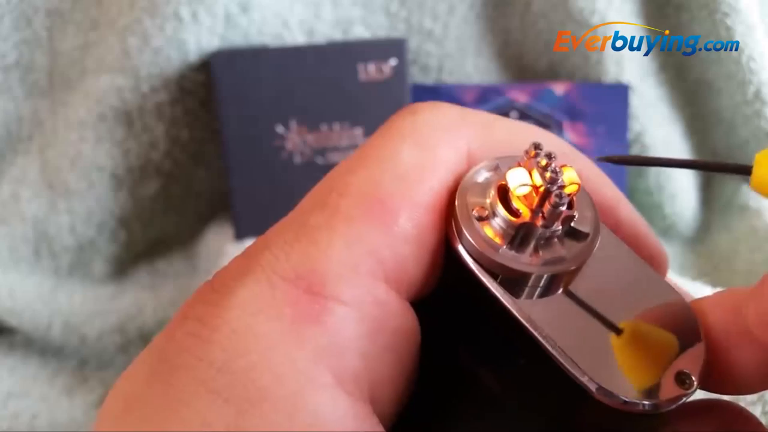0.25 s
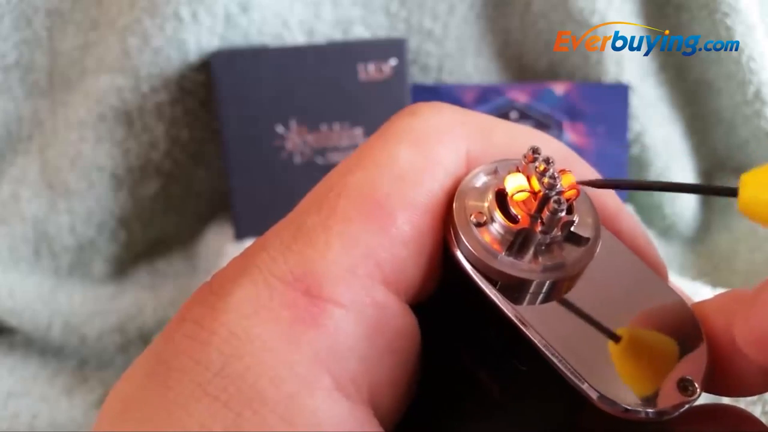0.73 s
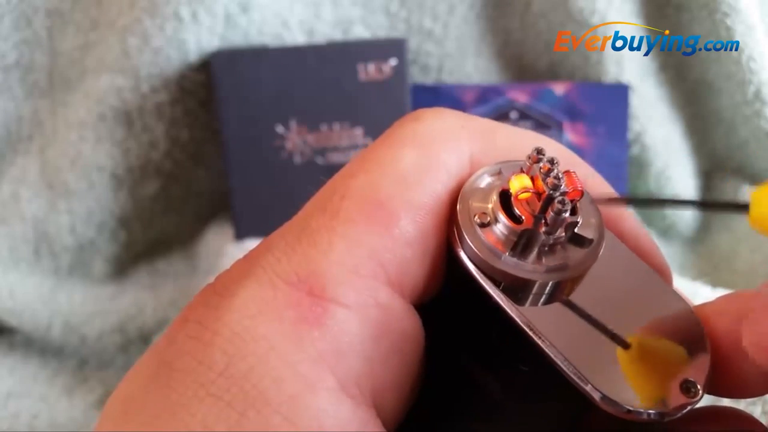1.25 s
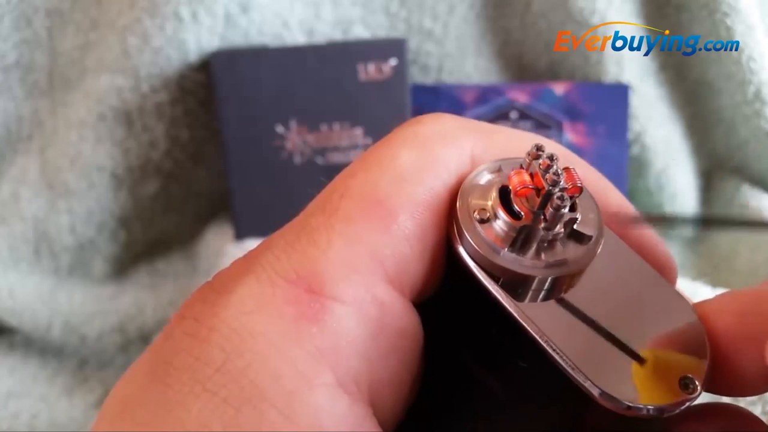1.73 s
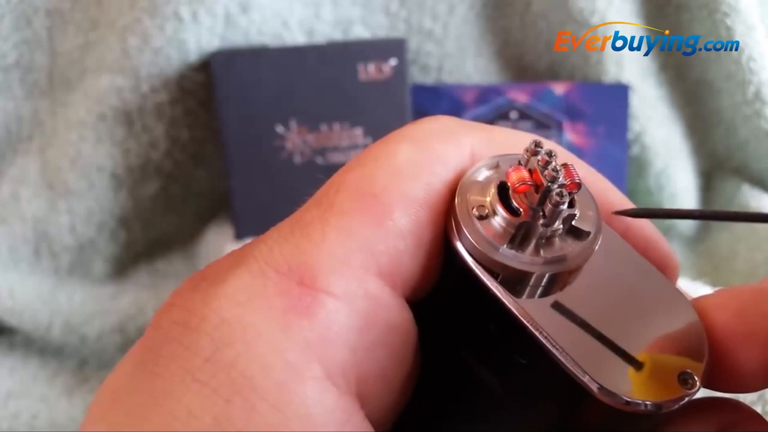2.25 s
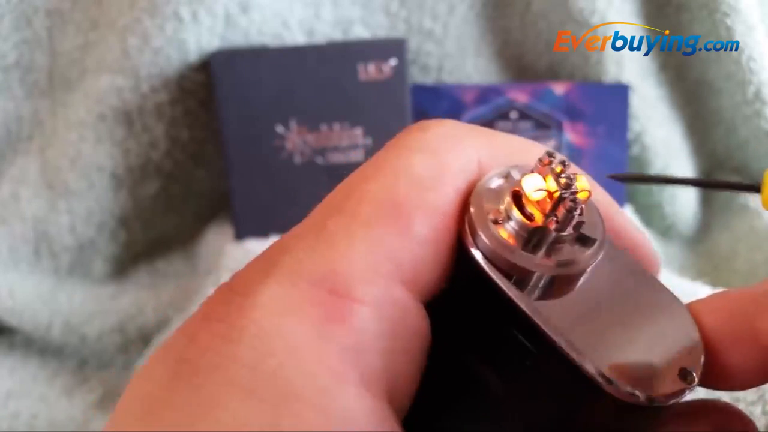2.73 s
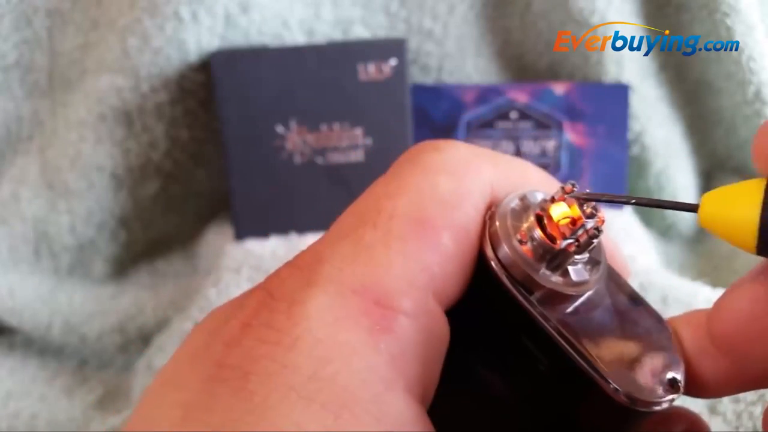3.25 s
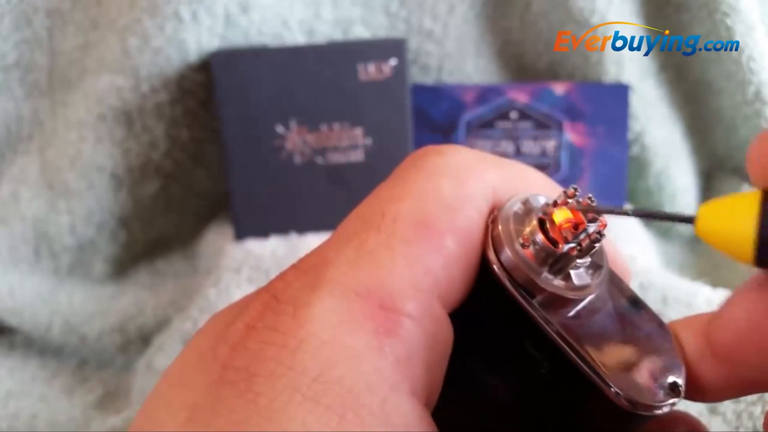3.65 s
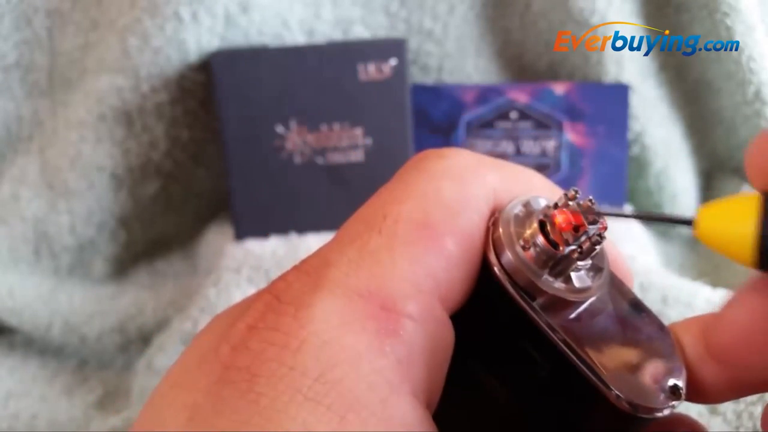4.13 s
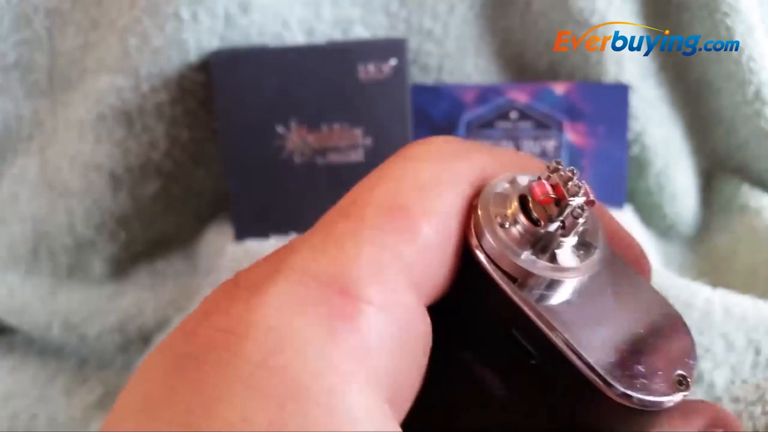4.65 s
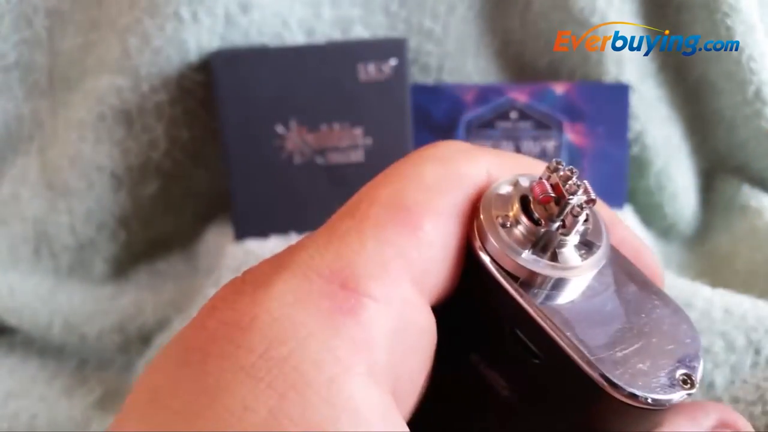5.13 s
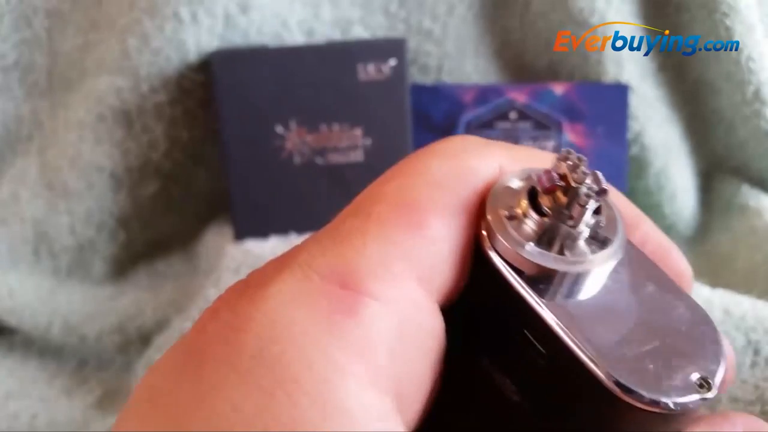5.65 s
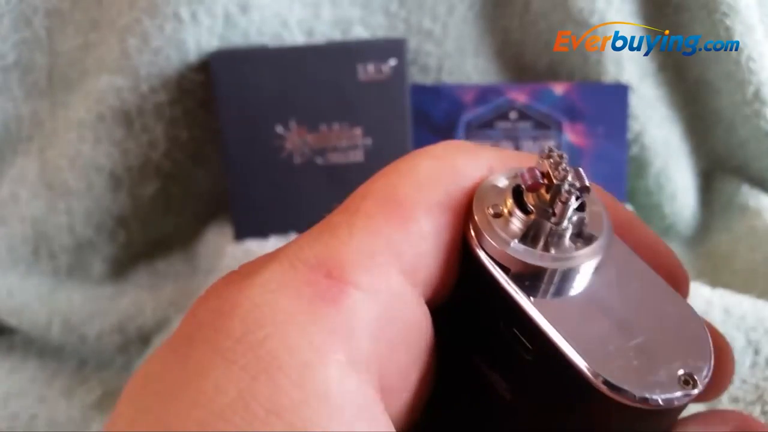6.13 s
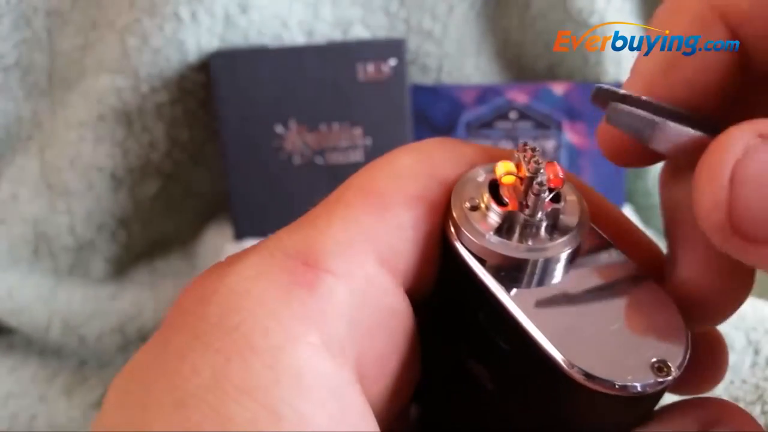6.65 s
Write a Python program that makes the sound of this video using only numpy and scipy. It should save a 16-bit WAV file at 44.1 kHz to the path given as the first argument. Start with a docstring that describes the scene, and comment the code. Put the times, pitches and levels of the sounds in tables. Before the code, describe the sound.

In a small quiet room with a steady low fan hum, a fine screwdriver rakes tiny wire coils, five short ridged scratches, a pause, then five more, with thin high squeals near the end. The hand then shifts its grip: the metal case clicks, rustles and takes two hard knocks, leaving small metallic rattles. Close stereo microphone, the case leaning left.

```python
"""Screwdriver on vape coils

A small screwdriver rakes the wire coils of a hand-held vape mod, in two runs of five strokes: each slip
is a burst of shaped noise that rings a post and a wire. Thin gliding sines squeal, the last after the tenth.
Then the grip shifts: the case rubs as grainy noise, clicks, and is knocked as a set of decaying modes, hard
enough to pull the recorder's gain down. A fan's air noise and low steady hum lie under it in a small, quiet room."""
import sys
import numpy as np
from scipy import signal
from scipy.fft import rfft, irfft, next_fast_len
from scipy.io import wavfile
from scipy.ndimage import uniform_filter1d, minimum_filter1d, map_coordinates

SR = 44100
rng = np.random.default_rng(int(sys.argv[2]) if len(sys.argv) > 2 else 0)


def generate_wav(signal):
    """Clip the signal to [-1, 1] and save it as 16-bit WAV at the path in sys.argv[1]."""
    frames = np.transpose(np.atleast_2d(signal))
    scaled = np.clip(frames, -1, 1) * 32767
    pcm = np.round(scaled).astype(np.int16)
    wavfile.write(sys.argv[1], SR, pcm)


N = 303981

# All table levels are relative dB: later gains add to them.
# Blade strokes over the coil. Each row: first slip in seconds, length in seconds, pace (1 even, less =
# speeding up), middle slip in dB, last slip over first in dB, outer slips under the middle in dB, drag in dB,
# pressure (weight of the lower spectrum) in dB, post ring in Hz, its gain in dB, wire ring in Hz, its gain in dB.
STROKES = [(1.255, 0.1, 1.2, -61.5, 1, -1, -62, 2, 2200, 12, 9500, 11),
           (1.541, 0.039, 0.82, -36.5, -4.5, -0.5, -49, -0.5, 3350, -1, 5300, 1),
           (1.801, 0.032, 0.88, -32.5, -9, 1.5, -47, -0.5, 3380, 4, 5500, 2),
           (2.0321, 0.04, 0.83, -34.5, -5.5, 0, -47, -1.5, 2200, -4, 5340, 4.2),
           (2.267, 0.028, 0.6, -32, 0, 0, -51.5, 3.5, 2400, -5.5, 6700, 3.7),
           (4.040, 0.048, 0.81, -43, -11, 0, -52.5, -3, 2150, 11, 8100, 4.3),
           (4.2864, .0305, .78, -36.5, -4, -1, -54.5, -6, 2190, 14, 7700, 3),
           (4.524, 0.026, 0.83, -34, -7, 2, -46.5, -6, 2320, 12.5, 7200, 6.6),
           (4.7481, 0.037, 0.96, -36, -12, 0.5, -51.5, -5, 2300, 9, 6160, 7),
           (4.9319, 0.025, 1.17, -29.5, 4, 3.5, -41.5, -7, 2010, 8.5, 6560, 7)]
# Single touches of the blade on the wire. Each row: start in seconds, level in dB.
TICKS = [(1.24, -57.5), (1.257, -49), (1.273, -41), (1.2925, -39), (1.3245, -33.5), (1.342, -47),
         (1.353, -49), (1.511, -55), (2.023, -52.5), (4.031, -47), (4.035, -51.5), (4.515, -48.5),
         (4.921, -47), (4.924, -37.5)]
# Spectrum of a scratch on the wire. Each row: frequency in Hz, level in dB.
WIRE_SPECTRUM = [(500, -20), (900, 4.5), (1200, 3.5), (1500, -9.5), (2150, 3), (3000, -1), (4500, -5),
                 (6000, -4), (7500, -0.5), (9500, -3), (12500, 1.5), (15500, -0.5)]
# Ringing posts of the coil deck. Each row: centre in Hz, width in Hz, level in dB.
DECK_MODES = [(1980, 150, -0.5), (2220, 57, -2.5), (2574, 39, 1.5), (3650, 40, 9.5), (5060, 89, -4)]
# Thin squeals, one curve each. Each row of a curve: time in seconds, pitch in Hz, level in dB.
WHISTLES = [
    [(1.85, 5420, -100), (1.9, 5400, -82), (2.0, 5360, -87), (2.04, 5350, -102)],
    [(4.8, 5730, -88), (4.834, 5897, -69), (4.87, 6050, -74), (4.91, 6140, -78), (4.98, 6300, -90)],
    [(5.0, 5320, -82), (5.034, 5483, -76), (5.066, 6100, -67), (5.12, 6348, -71), (5.18, 6800, -75),
     (5.228, 7000, -71), (5.27, 6750, -75), (5.322, 6304, -77), (5.392, 6160, -66.5), (5.44, 5700, -75),
     (5.47, 5550, -95)],
    [(5.48, 6200, -78), (5.495, 5950, -78), (5.515, 5700, -97)],
]
# Upper modes of the squeals. Each row: ratio to the pitch, level in dB.
WHISTLE_MODES = [(1.29, -9.5), (1.64, -4), (1.79, -5.5)]
# Treble hiss over time. Each row: time in seconds, level in dB.
HISS_LEVEL = [(0, -100), (1.2, -98), (1.4, -74.5), (2.249, -76), (2.6, -82), (3.2, -112), (3.9, -85),
              (4.17, -76.5), (5.06, -71.5), (5.3, -70), (5.62, -80), (6.05, -64), (6.3, -105)]
# Treble hiss spectrum. Each row: frequency in Hz, density in dB per Hz.
HISS_SPECTRUM = [(2000, -28), (4300, 3.5), (6500, 1), (8500, -8.5), (11000, -4), (14000, 4.5),
                 (15600, -1.5)]
# Knocks on the case. Each row: start in seconds, ring in dB, contact softness corner in Hz, place (0 middle,
# 1 edge), pitch ratio, left minus right in dB, thud in dB, thud pitch in Hz.
KNOCKS = [(5.6457, -19.5, 1900, 0.17, 1.06, -5, -18, 590),
          (5.665, -17.5, 130, 0.081, 1.03, -4.5, -22.5, 233), (5.7579, -32, 386, .12, 1.04, -6, -28, 230),
          (5.8989, -7, 3510, 0.25, 1.0, 0.5, -20.5, 760), (5.9365, -11, 2840, 0.97, 1.01, 0, -20.5, 760)]
# Modes of the case. Each row: frequency in Hz, level in dB, t60 in seconds, extra at the edge in dB.
CASE_MODES = [(52.2, -37.5, 0.97, -5), (142.2, -11, 0.3, -14), (355.7, -4, 0.053, -12.5),
              (429, -10.5, 0.038, -6.5), (680, -4.5, 0.014, -0.5), (886, -16.5, 0.045, 12.5),
              (1030, -5, .032, -4), (1594, -12, .016, -3), (1890, -13.5, 0.018, 6),
              (2090, -14.5, 0.021, 5.5), (2440, -13, 0.021, -8.5), (2580, -31.5, 0.16, -16),
              (3250, -30, 0.17, -26), (3270, -4, 0.015, -21.5), (3850, -18, 0.015, -7)]
# Finger bumps too dull to ring the case. Each row: start in seconds, level in dB, pitch in Hz.
BUMPS = [(0.680, -44.5, 594), (2.509, -45.5, 620), (3.308, -50, 200), (3.3115, -41.5, 560),
         (3.317, -55, 620), (5.688, -33.5, 620), (5.7657, -33, 480), (5.7712, -27, 332), (5.781, -34, 435),
         (5.7867, -35, 768), (5.798, -35, 540), (5.811, -36.5, 280), (5.818, -39, 201), (5.839, -38, 290),
         (5.870, -39, 400), (5.876, -37, 330)]
# Clicks of the button and loose fittings. Each row: start in seconds, level in dB, treble sizzle in dB.
CLICKS = [(5.6425, -37.5, 9.5), (5.647, -34, 7), (5.6662, -37.5, 10.5), (5.69, -32, 0.5),
          (5.759, -41.5, -18), (5.7655, -52, -23.5), (5.785, -40, -12), (5.849, -42.5, -17.5),
          (5.9386, -29.5, -4.5), (5.9535, -39, 4), (5.961, -42.5, -0.5), (5.997, -53, 9), (6.032, -48.5, 7),
          (6.047, -53, 5), (6.094, -53, 5), (6.175, -60.5, 13.5), (6.262, -48, 9), (6.269, -42.5, 7.5),
          (6.757, -58, 2), (6.814, -46, -13), (6.825, -50, 2), (6.834, -35, 6)]
# Resonances of the fittings. Each row: centre in Hz, width in Hz, level in dB.
FITTINGS = [(3950, 1000, -2), (6140, 900, -11), (7260, 500, 3), (7930, 490, 2)]
# Lasting ring of the fittings. Each row: frequency in Hz, level in dB, t60 in seconds.
TINKLE = [(5900, -12, 0.059), (6640, -11, 0.064), (7060, -4, 0.083), (7380, -4.5, 0.12), (7880, 3, 0.032),
          (10430, -11, .08), (12230, -21, .09)]
# Thin steel parts ringing on. Each row: start in seconds, level in dB, pitch in Hz, t60 in seconds.
PINGS = [(5.851, -47.5, 7950, .06), (5.939, -32, 7800, 0.033), (6.273, -57, 7200, 0.1),
         (6.432, -59, 7100, 0.33), (6.815, -54, 7700, .06), (6.834, -45, 7670, 0.12),
         (6.835, -54, 4920, 0.082)]
# Skin sliding on the case. Each row: start in seconds, length in seconds, level in dB, brightness corner in Hz.
RUBS = [(5.649, 0.056, -42, 1000), (5.765, 0.042, -44.5, 650), (5.809, 0.076, -47.5, 379),
        (5.945, 0.022, -38, 604), (6.77, 0.097, -46, 400)]
# Spectrum of sliding skin. Each row: frequency in Hz, level in dB.
SKIN_SPECTRUM = [(60, -10.5), (145, 4.5), (200, -1), (300, 1.5), (420, 0.5), (650, -6.5), (1100, -10),
                 (1600, -13), (4000, -10), (7500, -19.5), (15000, -24)]
# Scuffs with one resonance. Each row: start in seconds, length in seconds, level in dB, centre in Hz, width in Hz.
SCUFFS = [(6.217, 0.027, -61, 2940, 497), (6.252, 0.028, -52, 3030, 900), (6.767, 0.066, -46.5, 505, 312),
          (6.769, .05, -49, 1000, 604), (6.824, 0.04, -62, 4800, 300), (6.831, 0.01, -45, 1000, 910)]
# Fan air spectra: low, middle, high. Each row: frequency in Hz, density in dB per Hz.
FAN_LOW = [(15, -7.5), (30, -22), (48, -1.5), (75, -3.5), (110, -12.5), (170, -2.5), (240, -5.5),
           (330, -6.5), (400, -14), (520, -14), (700, -17), (1000, -21), (2000, -61)]
FAN_MID = [(410, -38), (700, -23.5), (846, -14), (951, -25), (1030, -6.5), (1120, -11.5), (1430, -11.5),
           (2000, -8.5), (2250, -4.5), (2380, -2), (2720, -12), (3240, -10), (4000, -23), (5200, -45.5),
           (8800, -120)]
FAN_HIGH = [(2500, -26), (4000, 1.5), (5000, 1), (7200, 2.5), (8300, -17.5), (10500, -10), (12500, 0.5),
            (14200, 8), (16000, -22.5)]
# Hum lines of the fan. Each row: frequency in Hz, level in dB rms.
HUM = [(58.5, -54), (117, -64), (167, -65.5), (233, -61), (303, -61), (485, -74), (1001, -78.5),
       (2328, -70)]
# Left-right likeness of air noise. Each row: frequency in Hz, correlation.
ALIKE = [(60, 0.8), (150, 0.94), (380, 0.46), (950, 0.009), (2380, 0.11), (5980, 0.03), (15000, 0.09)]
# Room decay. Each row: frequency in Hz, t60 in seconds.
ROOM_T60 = [(100, 0.54), (500, 0.38), (3000, 0.37), (8000, 0.5), (15000, 0.22)]
# Colour difference of the two microphone ports. Each row: frequency in Hz, left minus right in dB.
PORTS = [(2000, 1.5), (3000, 5), (4300, 3), (5800, 9.5), (7200, 5), (8300, -11.5), (10500, -16),
         (14000, -6)]
# Lean of the case, which lies to the left. Each row: frequency in Hz, left minus right in dB.
CASE_LEAN = [(60, 12), (150, 7.5), (400, 11.5), (850, 9.5), (1100, 4.5), (1400, 5), (2100, 4.5),
             (3000, 9.5), (8000, 8), (14000, 2)]

TOP_HZ = 15800  # band limit
WINDINGS = 7
OVERHANG_S = 0.0033  # blade contact before the first slip and after the last
SLIP_SCATTER_DB = -0.5  # random spread of the slips
PRESS_GROWS_DB = 17  # pressure on the last winding over the first
RIPPLE_HZ = 455  # spacing of the random peaks and dips in a scratch
THUD_CYCLES = 0.64  # half-width of a contact's push
# fittings shaken by a knock: level at a 0 dB middle blow, dB per dB of blow, extra at the edge, sizzle
SHAKE_DB, SHAKE_GROWS, SHAKE_EDGE_DB, SHAKE_SIZZLE_DB = -27, 0.99, 6.5, -4


def amp(db):
    """Decibels to gain."""
    return 10 ** (np.asarray(db) / 20)


def unit(x):
    """Scale to rms 1."""
    return x / np.sqrt(np.mean(x ** 2) + 1e-20)


def along(points, hz):
    """Interpolate (Hz, value) points on a log frequency axis."""
    f, v = np.transpose(points)
    return np.interp(np.log(hz + 1), np.log(f + 1), v)


def wobble(rate):
    """Smooth random curve with rate knots a second."""
    knots = rng.standard_normal(int(N * rate / SR) + 4)
    return map_coordinates(knots, [np.arange(N) * rate / SR])


def filtered(x, response, size=8192):
    """Multiply the spectrum of x by a complex response of frequency."""
    n = x.shape[-1]
    m = next_fast_len(n + size, real=True)
    return irfft(rfft(x, m) * response(np.fft.rfftfreq(m, 1 / SR)), m)[..., :n]


def noise(size, alike):
    """Stereo white noise whose sides share the power fraction alike."""
    share = np.clip(alike, 0, 1)
    common = np.sqrt(share) * rng.standard_normal(size)
    return common + np.sqrt(1 - share) * rng.standard_normal((2, size))


def pan(db):
    """Channel gains for a left-minus-right level."""
    return amp([[db / 2], [-db / 2]])


def add(track, s, sound):
    """Mix a sound in from time s."""
    part = track[..., round(s * SR):][..., :sound.shape[-1]]
    part += sound[..., :part.shape[-1]]


def bell(hz, centre, width):
    """Zero-phase resonance peak of height 1."""
    return 1 / (1 + (2 * (hz - centre) / width) ** 2)


def resonance(hz, centre, width):
    """Causal response of one mode."""
    return 1j * hz * width / (centre ** 2 - hz ** 2 + 1j * hz * width)


def ripple(hz, depth_db):
    """Fresh set of random peaks and dips in the spectrum."""
    knots = rng.standard_normal(128)
    return amp(depth_db * map_coordinates(knots, [hz / RIPPLE_HZ], mode="nearest"))


def coil(slip_t60_s=0.0059, rise_s=0.00094, slip_db=5, after_db=-27, after_t60_s=0.073, grit_db=4.5,
         ripple_db=4.0, press_hz=4000, tick_press_db=-9, post_width_hz=260, wire_width_hz=380):
    """The blade drops from winding to winding; each slip is a short scratch ringing post and wire."""
    out, t = np.zeros((2, N)), np.arange(SR // 6) / SR

    def scratch(press_db):
        def colour(hz):
            pressed_db = press_db / (1 + (hz / press_hz) ** 2)
            return ripple(hz, ripple_db) * amp(along(WIRE_SPECTRUM, hz) + pressed_db)
        return unit(filtered(noise(len(t), alike=0.22), colour, size=512))

    decay = amp(-60 * t / slip_t60_s) + amp(after_db - 60 * t / after_t60_s)
    slip = (1 - np.exp(-t / rise_s)) * decay
    grit = amp(grit_db * wobble(700))
    for (s, length_s, pace, db, swell_db, arch_db, drag_db, press_db,
         post_hz, post_db, wire_hz, wire_db) in STROKES:
        # bear down, drag, lift away
        bearing = np.sin(np.pi * np.minimum(t / (length_s + 2 * OVERHANG_S), 1))
        stroke = amp(drag_db) * bearing * scratch(press_db) * grit[round(s * SR):][:len(t)]
        for across in np.linspace(0, 1, WINDINGS):
            level_db = db + swell_db * (across - 0.5) - arch_db * (2 * across - 1) ** 2
            level_db += SLIP_SCATTER_DB * rng.standard_normal()
            touch = scratch(press_db + PRESS_GROWS_DB * (across - 0.5))
            add(stroke, OVERHANG_S + length_s * across ** pace, amp(level_db + slip_db) * slip * touch)

        def ring(hz):
            post = (amp(post_db) - 1) * resonance(hz, post_hz, post_width_hz)
            wire = (amp(wire_db) - 1) * resonance(hz, wire_hz, wire_width_hz)
            return 1 + post + wire

        add(out, s - OVERHANG_S, filtered(stroke, ring))
    for s, db in TICKS:
        add(out, s, amp(db + slip_db) * slip * scratch(tick_press_db))
    return out


def deck(x, ring_db=-2):
    """The scratches excite a few short resonances of the metal deck."""
    def modes(hz):
        return sum(amp(db) * resonance(hz, centre, width) for centre, width, db in DECK_MODES)
    return x + amp(ring_db) * filtered(x, modes)


def whistles(side_db=13, upper_side_db=-3, level_db=-5, flutter_db=3, waver=0.011,
             upper_hz=6300, upper_width_hz=250):
    """Thin gliding squeals; their upper modes join in as the pitch climbs."""
    out = np.zeros((2, N))
    flutter = amp(flutter_db * wobble(60))
    drift = 1 + waver * wobble(500)
    for rows in WHISTLES:
        s, hz, db = np.transpose(rows)
        i = np.arange(round(s[0] * SR), round(s[-1] * SR))
        pitch_hz = np.interp(i / SR, s, hz) * drift[i]
        phase = 2 * np.pi * np.cumsum(pitch_hz) / SR
        opening = (1 + np.tanh((pitch_hz - upper_hz) / upper_width_hz)) / 2
        upper = opening * sum(amp(mode_db) * np.sin(ratio * phase) for ratio, mode_db in WHISTLE_MODES)
        level = amp(level_db + np.interp(i / SR, s, db)) * flutter[i] * np.sqrt(2)
        out[:, i] += level * (pan(side_db) * np.sin(phase) + pan(upper_side_db) * upper)
    return out


def thud(t, hz):
    """Push of a contact: about one cycle, with no ring."""
    cycles = t * hz
    return np.sin(2 * np.pi * cycles) * np.exp(-((cycles - 1) / THUD_CYCLES) ** 2)


def knocks(choke_hz=2200, choke_t60_s=0.014, buzz_db=1.5, crack_db=-23, crack_t60_s=0.013,
           rise_s=0.00037, bump_side_db=-4):
    """Blows ring the case: soft ones its low modes; grip shifts pitch, the next contact chokes high modes."""
    out, t = np.zeros((2, N)), np.arange(SR // 3) / SR
    for k, (s, db, soft_hz, edge, tuning, side_db, thud_db, thud_hz) in enumerate(KNOCKS):
        free_s = KNOCKS[k + 1][0] - s if k + 1 < len(KNOCKS) else 1
        choke = amp(-60 * np.maximum(t - free_s, 0) / choke_t60_s)
        ring = np.zeros(len(t))
        for m, (hz, mode_db, t60_s, edge_db) in enumerate(CASE_MODES):
            decay = amp(mode_db + edge * edge_db - 60 * t / t60_s) / np.hypot(1, hz / soft_hz)
            if hz > choke_hz:
                decay = decay * choke
            ring += (-1) ** m * decay * np.sin(2 * np.pi * tuning * hz * t)
        ring = ring * amp(buzz_db * wobble(370)[:len(t)])  # loose parts roughen the ring
        crack = unit(filtered(noise(len(t), alike=0.6), lambda hz: 1 / (1 + 1j * hz / soft_hz) ** 2))
        crack = amp(crack_db - 60 * t / crack_t60_s) * crack
        blow = amp(db) * (1 - np.exp(-t / rise_s)) * (ring + crack)
        add(out, s, pan(side_db) * (blow + amp(thud_db) * thud(t, thud_hz)))
    for s, db, hz in BUMPS:
        add(out, s, pan(bump_side_db) * amp(db) * thud(t, hz))
    return out


def clicks(snap_t60_s=0.0096, rattle_db=-20, rattle_t60_s=0.17, sizzle_db=-6, rise_s=0.0011,
           tinkle_db=-14, scatter_db=2.5, body_hz=8600, chatter_db=2.5, chatter_rate=220):
    """Small metal parts snap, rattle briefly in their resonances and ring on; every knock shakes them."""
    out, t = np.zeros((2, N)), np.arange(SR // 3) / SR

    def metal(hz):
        peaks = sum(amp(db) * bell(hz, centre, width) for centre, width, db in FITTINGS)
        return peaks / np.hypot(1, (hz / body_hz) ** 10)

    def treble(hz):
        return hz / (hz + 3000) * (hz < TOP_HZ)

    attack = 1 - np.exp(-t / rise_s)
    snap = attack * amp(-60 * t / snap_t60_s)
    rattle = attack * amp(rattle_db - 60 * t / rattle_t60_s)
    shaken = [(s, SHAKE_DB + SHAKE_GROWS * db + SHAKE_EDGE_DB * edge, SHAKE_SIZZLE_DB)
              for s, db, _, edge, *_ in KNOCKS]
    for s, db, top_db in CLICKS + shaken:
        body = unit(filtered(noise(len(t), alike=0.22), metal))
        sizzle = unit(filtered(noise(len(t), alike=0.17), treble))
        tinkle = np.zeros((2, len(t)))
        for hz, mode_db, t60_s in TINKLE:
            level_db = mode_db + scatter_db * rng.standard_normal((2, 1))
            tinkle += amp(level_db - 60 * t / t60_s) * np.sin(2 * np.pi * (hz * t + rng.random((2, 1))))
        chatter = unit(amp(chatter_db * wobble(chatter_rate)[:len(t)]))  # uneven bursts
        struck = (snap + rattle * chatter) * (body + amp(sizzle_db + top_db) * sizzle)
        add(out, s, amp(db) * (struck + amp(tinkle_db) * attack * tinkle))
    for s, db, ping_hz, ping_t60_s in PINGS:
        add(out, s, amp(db - 60 * t / ping_t60_s) * attack * np.sin(2 * np.pi * ping_hz * t))
    return out


def rubs(grip_db=2.5, catch_rate=300, side_db=-5):
    """Skin catches and slides on the case: dull grainy rustles and brief scuffs."""
    out, t = np.zeros((2, N)), np.arange(SR // 4) / SR

    def slide(length_s, colour):
        # a faint remainder lasts to the end of t
        envelope = np.interp(t / length_s, [0, 0.08, 0.8, 1.2, 2], [0.82, 0.94, 1, 0.074, 0.076])
        return envelope * unit(filtered(noise(len(t), alike=0.72), colour))

    for s, length_s, db, bright_hz in RUBS:
        skin = slide(length_s, lambda hz: amp(along(SKIN_SPECTRUM, hz)) / np.hypot(1, hz / bright_hz))
        add(out, s, amp(db) * skin)
    for s, length_s, db, centre, width in SCUFFS:
        add(out, s, amp(db) * slide(length_s, lambda hz: bell(hz, centre, width)))
    grain = unit(amp(grip_db * wobble(catch_rate)))
    return pan(side_db) * out * grain * np.sqrt(2)


def rush(spectrum):
    """Stereo air noise of rms 1, mixed from mid and side to the likeness of each frequency."""
    def split(hz):
        turn = np.arccos(np.clip(along(ALIKE, hz), -1, 1)) / 2
        return amp(along(spectrum, hz)) * [np.cos(turn), np.sin(turn)]
    mid, side = filtered(rng.standard_normal((2, N)), split)
    return unit(np.array([mid + side, mid - side]))


def hiss(side_db=-1):
    """Faint treble noise that swells with both runs of strokes and again just after the knocks."""
    s, db = np.transpose(HISS_LEVEL)
    return pan(side_db) * amp(np.interp(np.arange(N) / SR, s, db)) * rush(HISS_SPECTRUM)


def fan(low_db=-54, mid_db=-62, high_db=-81, whine_db=-69, whine_hz=2330, whine_width_hz=175,
        drift_rad=0.16):
    """Air noise, a narrow housing resonance and hum lines that waver more the higher they lie."""
    t = np.arange(N) / SR
    hum = np.zeros(N)
    for hz, db in HUM:
        waver = drift_rad * hz / 100 * wobble(7)  # drift_rad applies at 100 Hz
        hum += amp(db) * np.sqrt(2) * np.sin(2 * np.pi * (hz * t + rng.random()) + waver)
    whine = unit(filtered(noise(N, alike=0.2), lambda hz: bell(hz, whine_hz, whine_width_hz)))
    air = amp(low_db + 0.3 * wobble(5.8)) * rush(FAN_LOW)
    air += amp(mid_db) * rush(FAN_MID) + amp(high_db) * rush(FAN_HIGH)
    return hum + air + amp(whine_db) * whine


def room(x):
    """Soft noise tail in which each frequency dies at its own speed."""
    hz, t, z = signal.stft(rng.standard_normal((2, SR // 2)), SR, nperseg=256)
    decay = amp(-60 * t / along(ROOM_T60, hz)[:, None])
    tail = signal.istft(z * decay, SR, nperseg=256)[1]
    tail = tail / np.linalg.norm(tail[0])
    return signal.fftconvolve(x.mean(0)[None], tail, axes=1)[:, :N]


def heard(x, lean, lag_s):
    """Close sound at the two ports: their colours, a lean to one side, the left lag_s later."""
    half = np.array([[0.5], [-0.5]])

    def response(hz):
        level_db = half * (along(PORTS, hz) + along(lean, hz))
        return amp(level_db) * np.exp(-2j * np.pi * hz * lag_s * half)

    return filtered(x, response)


def scene(coil_room_db=-19, case_room_db=-21):
    """Close sounds with a little room, over fan and hiss."""
    wire = deck(coil())
    case = knocks() + clicks() + rubs()
    near = heard(wire, [(1000, 0.0037)], lag_s=0.00003) + heard(case, CASE_LEAN, lag_s=0.00013)
    near += whistles()
    tail = room(amp(coil_room_db) * wire + amp(case_room_db) * case)
    return near + tail + fan() + hiss()


def record(dry, limit_db=-2.0, ceiling_db=-11, settle_s=0.18, size=32):
    """Limit peaks; sink the gain by the largest excess so far over the ceiling, and stay down; band-limit."""
    needed = np.minimum(amp(limit_db) / (np.abs(dry).max(0) + 1e-9), 1)
    limited = dry * uniform_filter1d(minimum_filter1d(needed, size), size)
    excess_db = np.maximum(20 * np.log10(np.abs(limited).max(0) + 1e-9) - ceiling_db, 0)
    step = 1 / (settle_s * SR)
    duck_db = signal.lfilter([step], [1, step - 1], np.maximum.accumulate(excess_db))
    return filtered(limited * amp(-duck_db), lambda hz: hz < TOP_HZ)


dry = scene()
out = record(dry)
generate_wav(out)
```